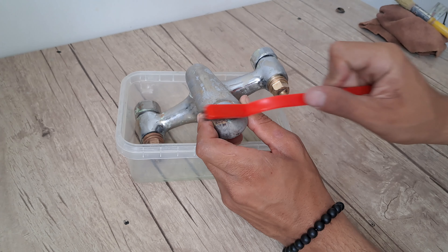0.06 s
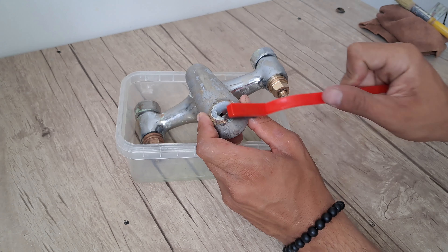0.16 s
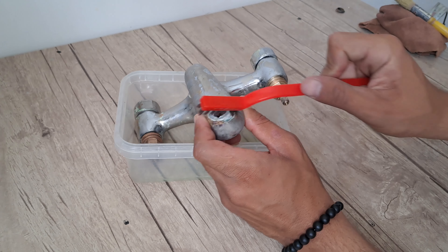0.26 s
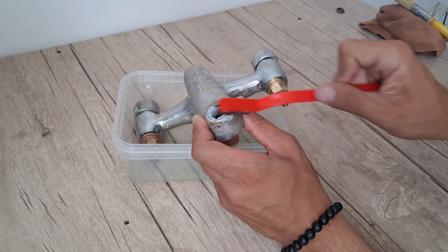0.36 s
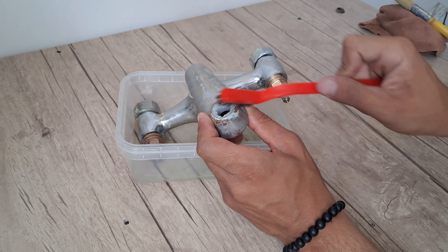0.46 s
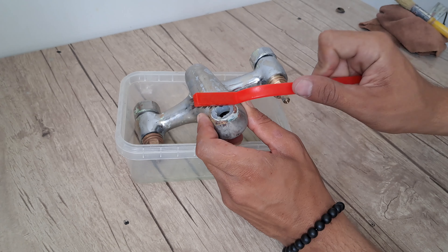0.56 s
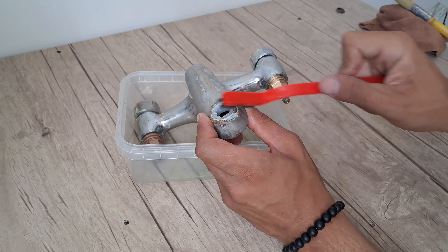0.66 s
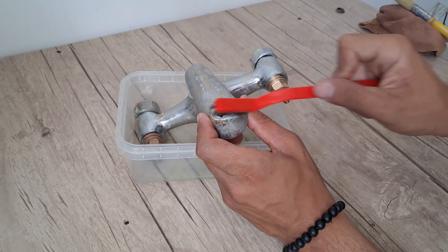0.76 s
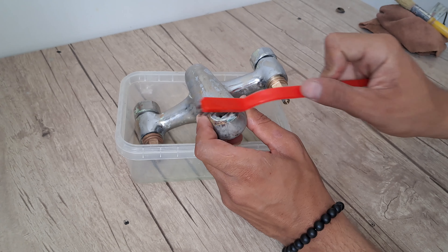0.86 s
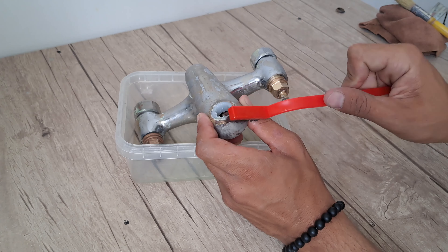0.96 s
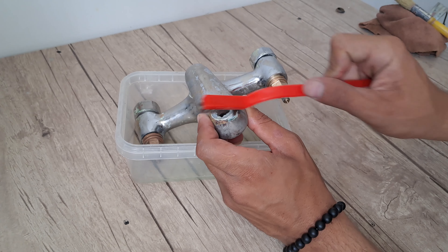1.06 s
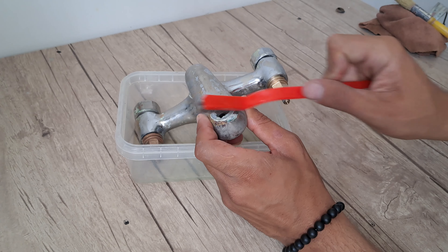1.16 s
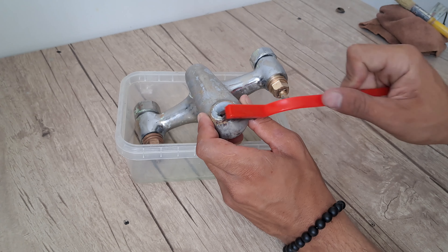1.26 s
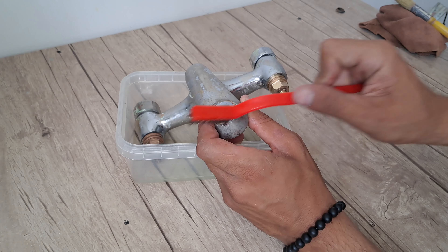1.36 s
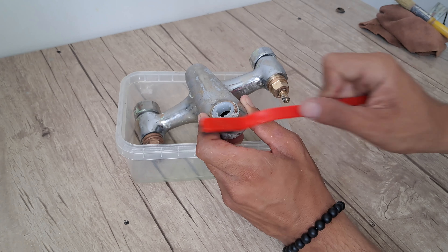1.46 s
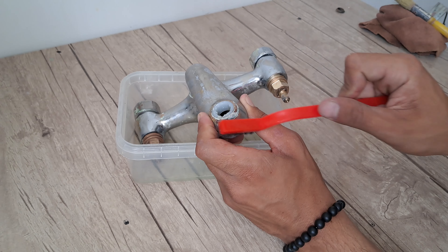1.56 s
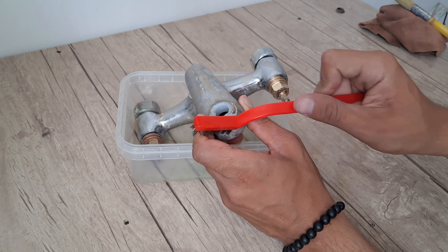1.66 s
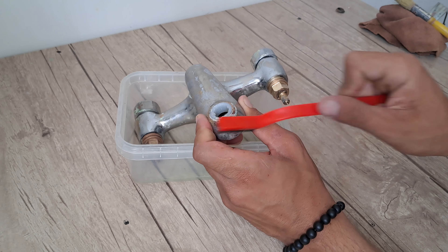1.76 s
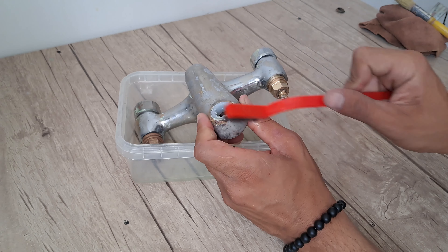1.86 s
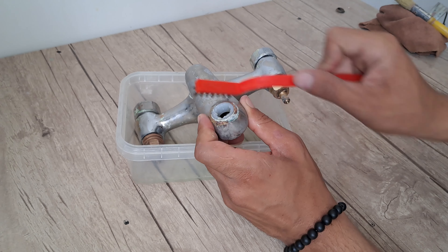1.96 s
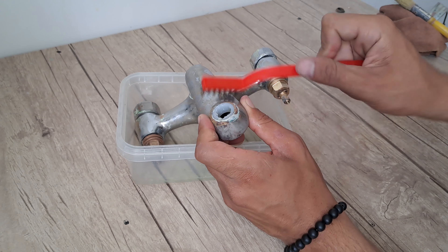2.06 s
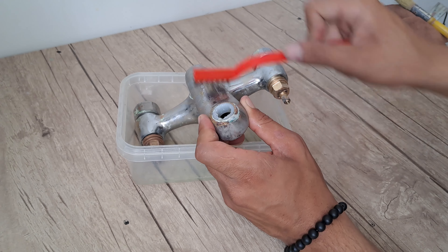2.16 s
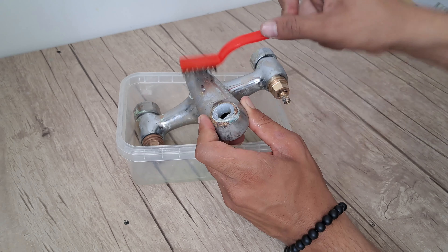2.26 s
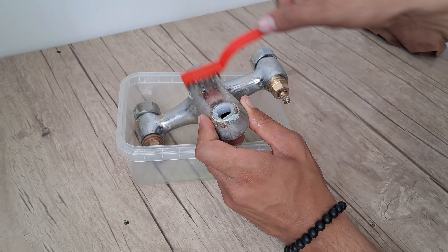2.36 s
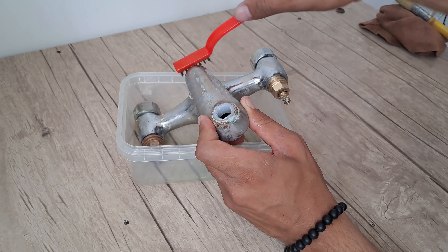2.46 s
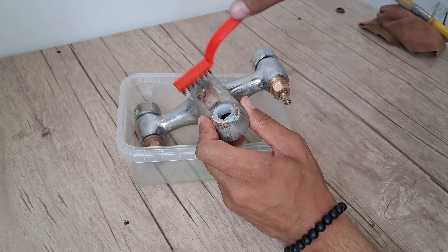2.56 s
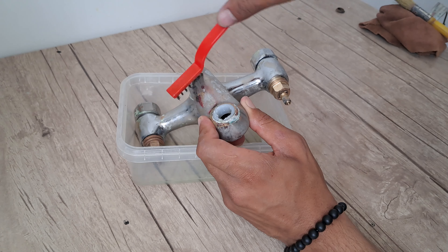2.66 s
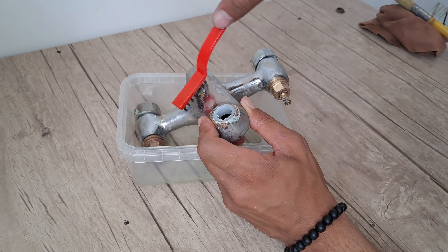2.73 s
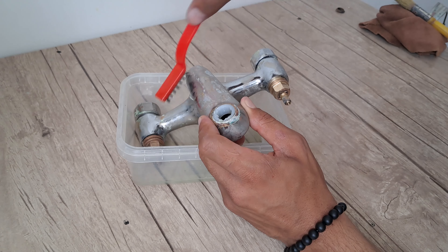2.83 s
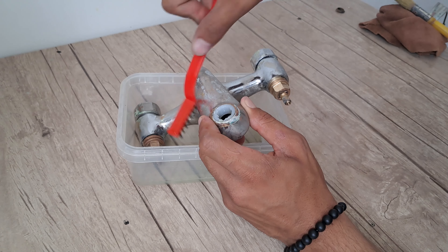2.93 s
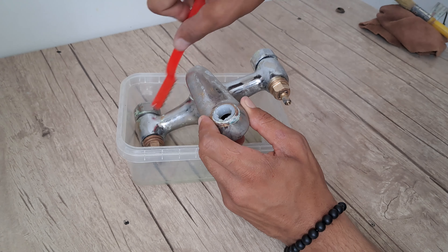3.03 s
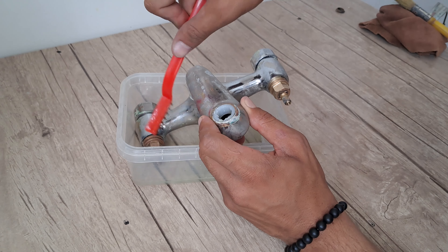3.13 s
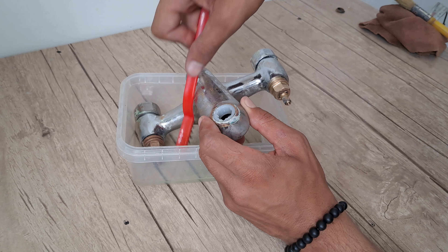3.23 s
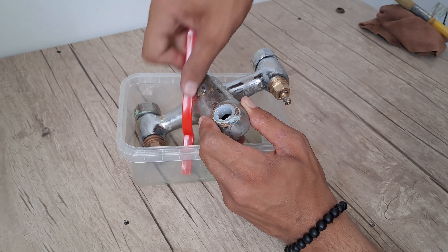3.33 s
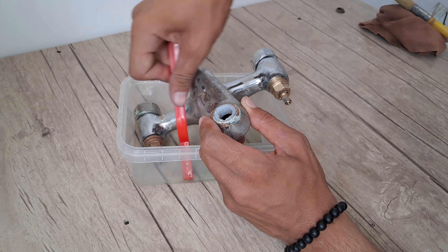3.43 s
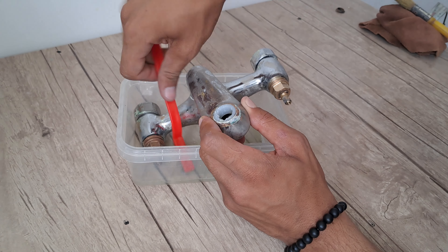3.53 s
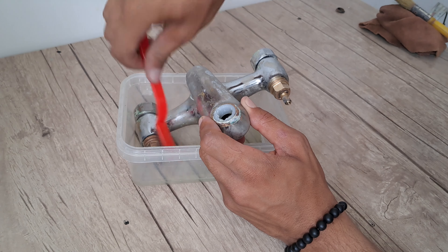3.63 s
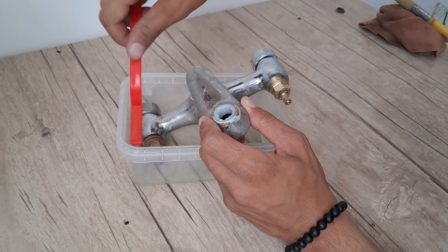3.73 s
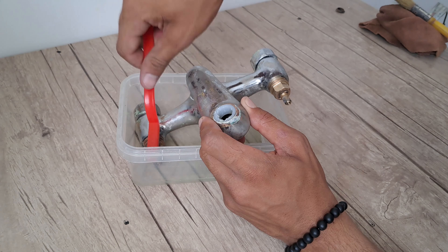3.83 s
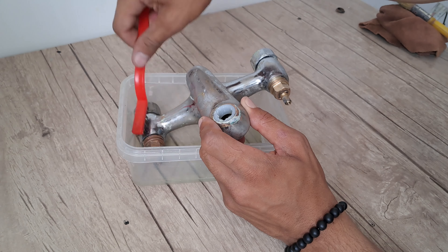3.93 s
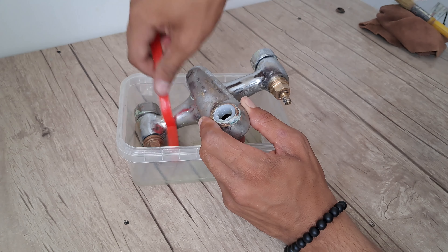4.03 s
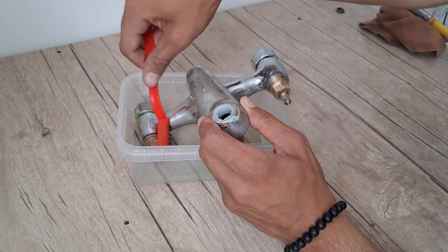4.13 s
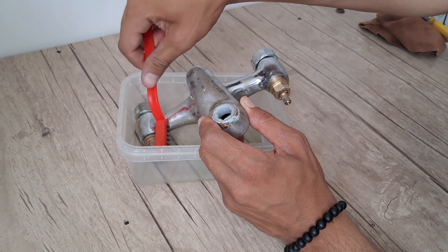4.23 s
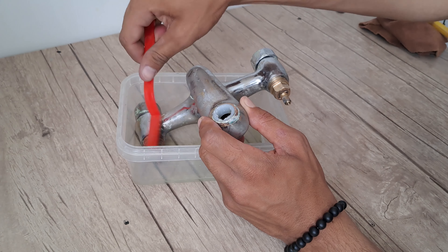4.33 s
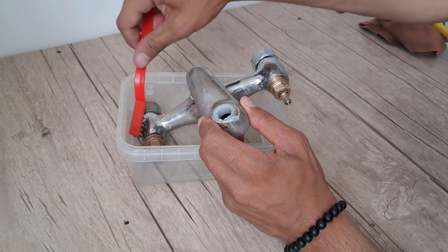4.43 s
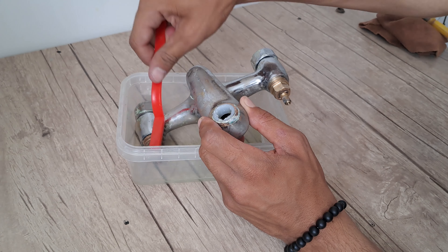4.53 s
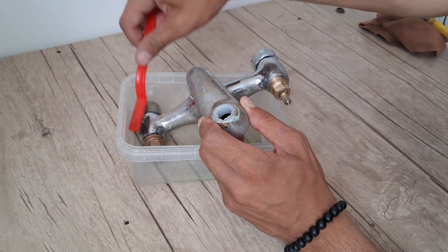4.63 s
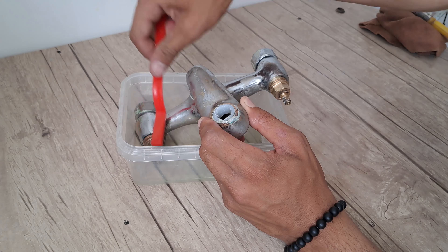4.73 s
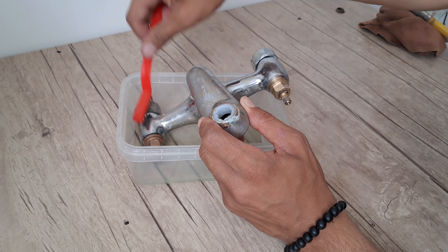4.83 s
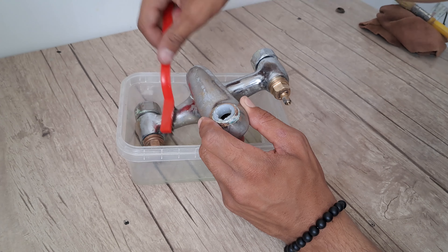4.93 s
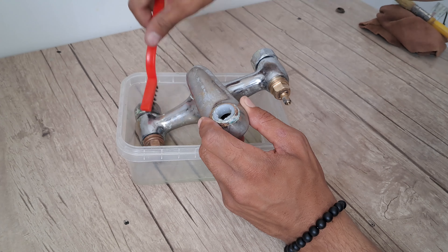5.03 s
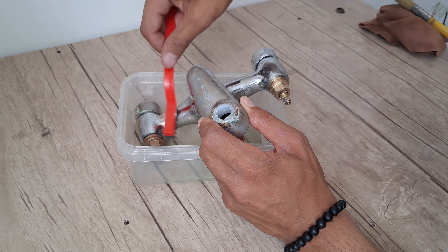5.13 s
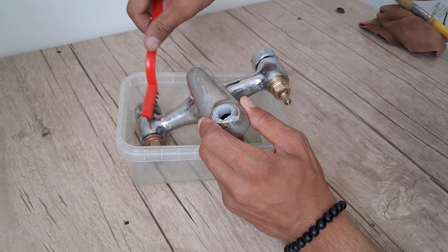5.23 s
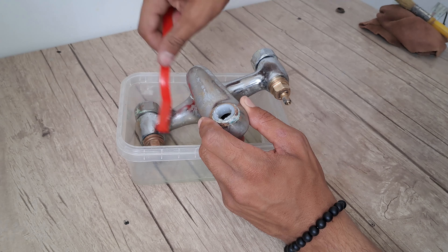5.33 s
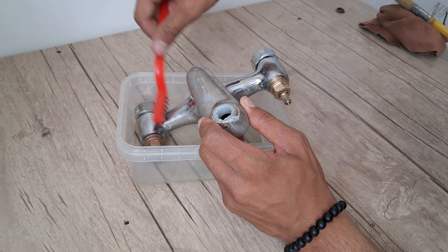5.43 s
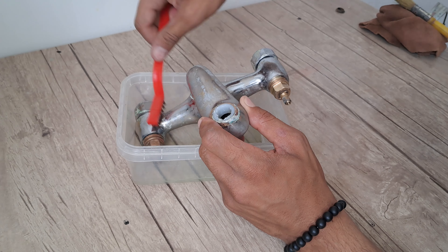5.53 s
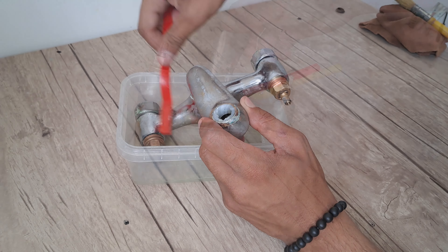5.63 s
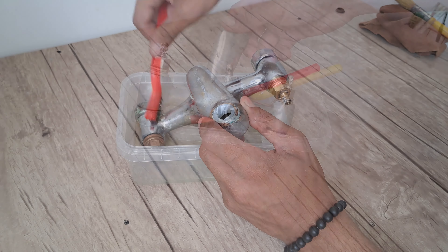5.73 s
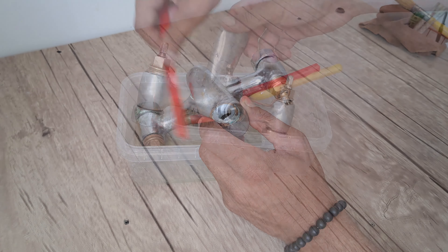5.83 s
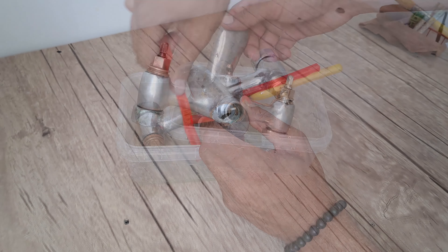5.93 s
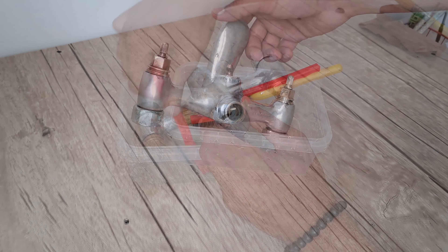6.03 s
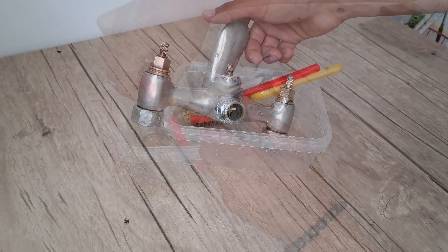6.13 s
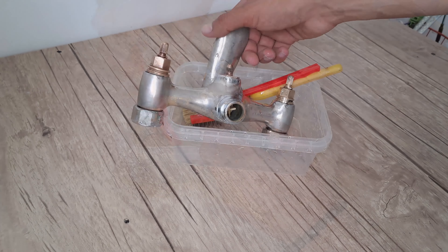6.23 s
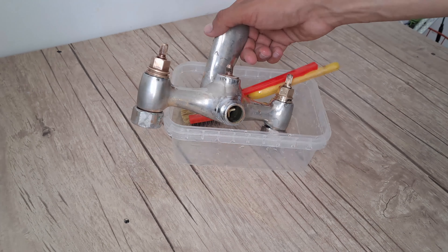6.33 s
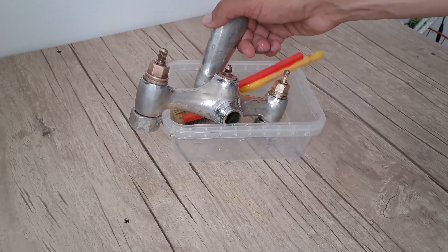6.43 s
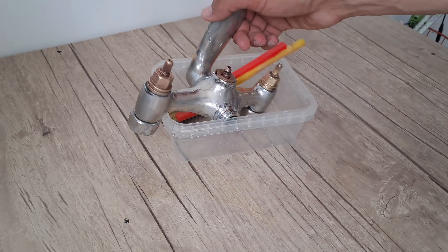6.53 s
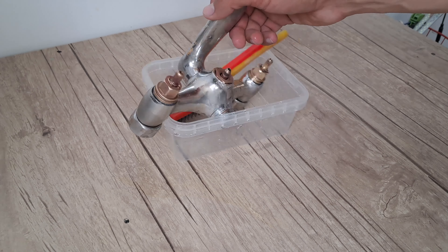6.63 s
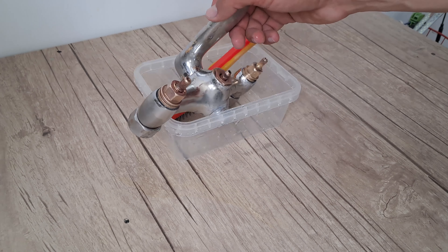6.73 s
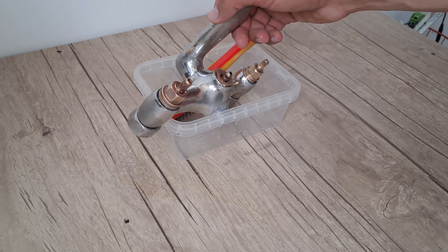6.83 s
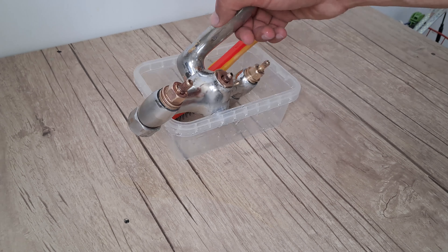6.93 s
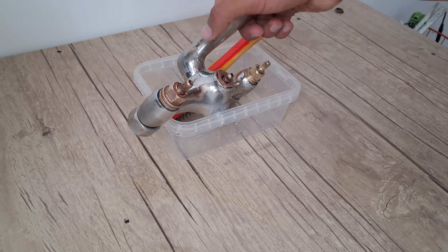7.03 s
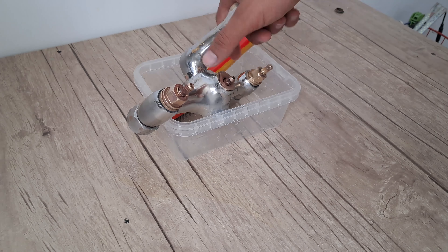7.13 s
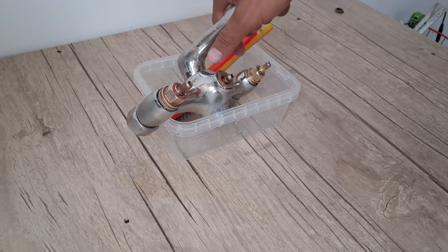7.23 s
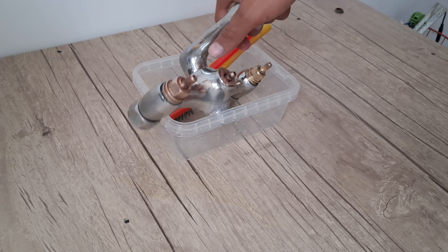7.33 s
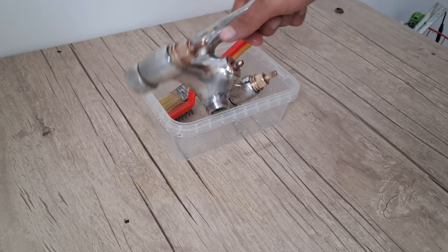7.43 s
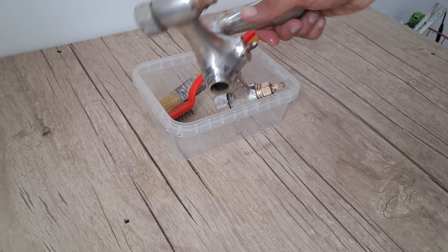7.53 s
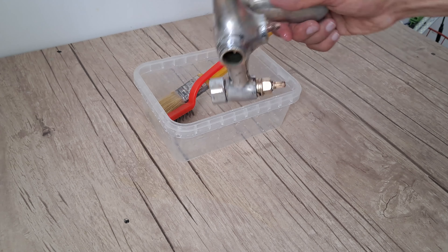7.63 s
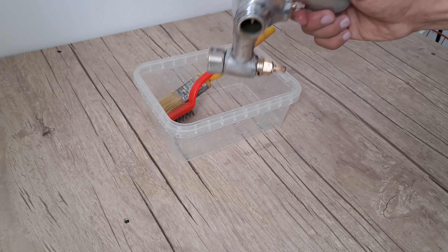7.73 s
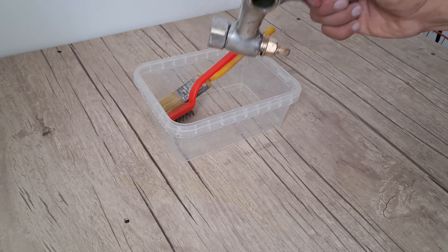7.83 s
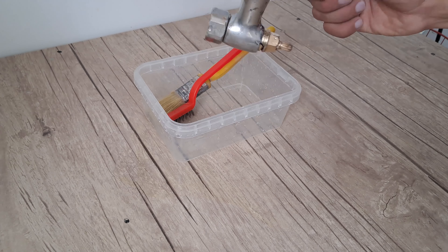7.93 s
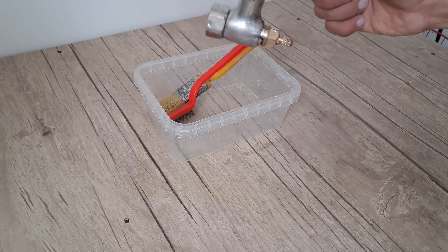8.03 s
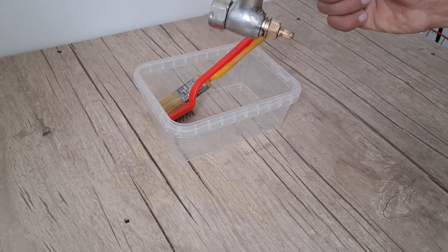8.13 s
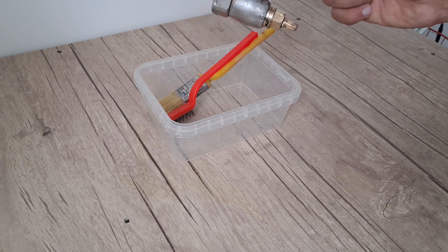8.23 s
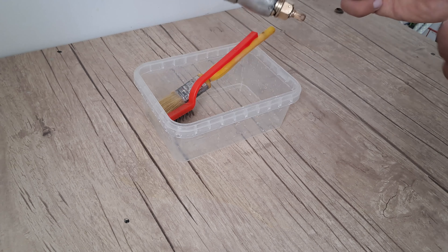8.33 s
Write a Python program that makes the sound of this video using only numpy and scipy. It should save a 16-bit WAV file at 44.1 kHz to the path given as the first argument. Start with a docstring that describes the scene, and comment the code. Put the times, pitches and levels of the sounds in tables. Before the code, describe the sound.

A small quiet room, heard closely in stereo with short soft echoes and faint room noise. From 0 to about 2 s a small wire brush rasps on a metal faucet, roughly seven strokes a second, bright and hissy with small snaps and faint low table rumble. From 2.1 to 3.1 s the strokes turn sparser and change colour, with pings at about 2.5 and 2.9 s and a soft thump near 3. A near pause holds knocks on the plastic tub and a short scrape around 3.6 s. Scrubbing resumes from 3.85 s, more hollow, with firm knocks at 4.1 and 4.65 s, a faint rising squeak at 4.6 s, then rapid even strokes from 5.1 to 5.85 s. After a quiet gap, the tub drags grainily on wood from 6.3 to 6.75 s. Bumps at 7.25 to 7.6 s and bright loose metal clinks until 8.1 s end it.

```python
"""Rasping strokes of a small wire brush on a metal faucet, held over a plastic tub on a wooden table in a small room.
Grains of noise are coloured as wire flicks; the strokes' pull drives drones of brush head and tub, and the table.
Now and then come modal knocks and pings, and one stick-slip squeak as the wires rub the plastic.
Then the tub drags across the table as scraped grains, and the faucet is lifted out with modal clinks."""
import sys
import numpy as np
from scipy import signal
from scipy.fft import rfft, irfft, next_fast_len
from scipy.io import wavfile
from scipy.ndimage import uniform_filter1d, map_coordinates

SR = 44100
rng = np.random.default_rng(int(sys.argv[2]) if len(sys.argv) > 2 else 0)


def waveform_to_disk(signal):
    """Save audio, clipped to [-1, 1], as 16-bit WAV at the path in sys.argv[1]."""
    frames = np.transpose(np.atleast_2d(signal))
    scaled = np.clip(frames, -1, 1) * 32767
    samples = np.round(scaled).astype(np.int16)
    wavfile.write(sys.argv[1], SR, samples)


N = 369558
TIME = np.arange(N) / SR
CUTOFF_HZ = 16200
FIR_SIZE = 16384
GRID_HZ = np.maximum(np.arange(FIR_SIZE // 2 + 1) * SR / FIR_SIZE, 1)


def from_db(db):
    """Decibels to gain."""
    return 10 ** (np.asarray(db) / 20)


def rms_one(x):
    """Scale to rms 1."""
    return x / np.sqrt(np.mean(x ** 2) + 1e-20)


def drift(rate_hz):
    """Smooth chance of rms 1: random knots, rate_hz of them a second."""
    knots = rng.standard_normal(N // 40)
    return rms_one(np.interp(TIME * rate_hz, np.arange(len(knots)), knots))


def level(curve):
    """Gain over time from (t/s, level/dB) rows, silent outside them."""
    s, db = np.transpose(curve)
    inside = (TIME >= s[0]) * (TIME <= s[-1])
    return from_db(np.interp(TIME, s, db)) * inside


def swells(events, rise_s, dies_s):
    """Summed gain of pushes (t/s, level/dB): linear rise, exponential decay."""
    gain = 0
    for s, db in events:
        rise = np.clip((TIME - s) / rise_s, 0, 1)
        gain = gain + from_db(db) * rise * np.exp(-np.maximum(TIME - s - rise_s, 0) / dies_s)
    return gain


def linger(gain, release_s):
    """One-pole smoothing of power: follows a level late and dies away after it."""
    keep = np.exp(-1 / (release_s * SR))
    return np.sqrt(signal.lfilter([1 - keep], [1, -keep], gain ** 2 + 1e-18))


def convolve(x, response):
    """Pass a stereo signal through a response."""
    return signal.fftconvolve(x, np.atleast_2d(response), axes=-1)[:, :N]


def colour(spectrum, peaks=()):
    """Minimum-phase response: broad spectrum, bass roll-off, narrow resonances on top."""
    hz, db = np.transpose(spectrum)
    gain = from_db(np.interp(np.log(GRID_HZ), np.log(hz), db))
    gain = gain / np.sqrt(1 + (hz[0] / 2 / GRID_HZ) ** 4)
    for centre, width, lift_db in peaks:
        gain = gain * (1 + (from_db(lift_db) - 1) / (1 + (2 * (GRID_HZ - centre) / width) ** 2))
    cepstrum = irfft(np.log(gain + 1e-9))[:FIR_SIZE // 2]
    cepstrum[1:] *= 2  # folding the cepstrum makes it causal
    return irfft(np.exp(rfft(cepstrum, FIR_SIZE)))


def favour(x, hz, q):
    """The part of a sound that lies in one resonance."""
    return signal.lfilter(*signal.iirpeak(hz, q, fs=SR), x)


def resonate(x, modes):
    """Parallel resonances (f/Hz, width/Hz, level/dB), steep fall above the last; rms 1."""
    out = 0
    for k, (hz, width, db) in enumerate(modes):
        r = np.exp(-np.pi * width / SR)
        poles = [1, -2 * r * np.cos(2 * np.pi * hz / SR), r * r]
        ring = (1 - r * r) * signal.lfilter([1, 0, -1], poles, x)
        out = out + (-1) ** k * from_db(db) * ring
    lowpass = signal.butter(4, 1.73 * modes[-1][0], fs=SR, output="sos")
    return rms_one(signal.sosfilt(lowpass, out))


def grains(per_s, spread_db, apart):
    """Random tiny slips of uneven size and sign, partly separate at each ear; rms 1."""
    sizes = from_db(spread_db * np.minimum(rng.exponential(1, (3, N)), 4))
    sizes = sizes * rng.choice([-1, 1], (3, N))
    slips = sizes * (rng.random(sizes.shape) < per_s / SR)
    return rms_one(slips[0] + apart * slips[1:])


def late_right(x, lag_s):
    """A source to the left reaches the right ear a little later."""
    size = next_fast_len(N + FIR_SIZE)
    turn = np.exp(-2j * np.pi * np.arange(size // 2 + 1) * SR / size * lag_s)
    return np.array([x[0], irfft(rfft(x[1], size) * turn, size)[:N]])


def close_ears(x):
    """The ears are close together, so they hear the bass alike: the side signal is high-passed."""
    mid, side = (x[0] + x[1]) / 2, (x[0] - x[1]) / 2
    side = signal.lfilter(*signal.butter(1, 240, "high", fs=SR), side)
    return np.array([mid + side, mid - side])


# quiet room noise: f/Hz, level/(dB per Hz)
FLOOR = [(15, -42.5), (25, -7), (102, 0.5), (1820, -26.5), (4690, -30), (7030, -29.5), (8050, -26),
         (15800, -43)]
FLOOR_DB = -71.5


def quiet_room():
    """Steady coloured noise, partly separate at each ear."""
    noise = rng.standard_normal(N) + 1.0 * rng.standard_normal((2, N))
    return from_db(FLOOR_DB) * rms_one(convolve(noise, colour(FLOOR)))


def room(x, t60, wall_hz, first_s):
    """Diffuse decaying echoes, different at each ear and dulled by the walls."""
    t = TIME[:SR // 2]
    tail = rng.standard_normal((2, len(t))) * np.exp(-np.log(1000) * t / t60) * (t > first_s)
    tail = tail / np.sqrt(np.sum(tail ** 2) / 2)
    return convolve(x, signal.lfilter(*signal.butter(1, wall_hz, fs=SR), tail))


# table-top resonances: f/Hz, width/Hz, level/dB
TABLE = [(71.7, 5.7, -4), (94.6, 21, -7.5), (122.9, 8.6, 3.5), (139, 7.9, -3.5), (178, 130, -18)]
# faucet weight shifts and rocks the tub: t/s, level/dB
ROCKS = [(0.35, -44.5), (0.525, -41), (1.125, -46), (1.39, -37), (2.215, -44), (2.615, -41), (2.825, -39),
         (2.88, -37), (3.01, -38.5), (3.39, -46.5), (7.268, -37.5), (7.6, -45.5)]
ROCK_RISE_S, ROCK_DIES_S = 0.0067, 0.05


def table(stroke_shake):
    """Strokes and rocking drive the heavy top, which follows late and rings on."""
    shake = np.hypot(stroke_shake, swells(ROCKS, ROCK_RISE_S, ROCK_DIES_S))
    return linger(shake, release_s=.024) * resonate(grains(per_s=3000, spread_db=3.0, apart=0.27), TABLE)


# tub scraped by the brush head, later dragged over the table: start t/s, full speed t/s, stop t/s, level/dB
RUBS = [(3.541, 3.625, 3.645, -43), (6.297, 6.472, 6.735, -33.5)]
RUB_SAG_DB_PER_S, RUB_STOP_DB_PER_S = 14, 541
# scrape spectrum: f/Hz, level/(dB per Hz)
DRAG_COLOUR = [(70, -14.5), (160, -1.5), (280, 3), (550, 0), (1000, -1.5), (1450, -12), (2500, -12.5),
               (4500, -17.5), (7500, -18), (8700, -24.5), (12000, -19), (15800, -24.5)]
# tub-wall resonances: f/Hz, width/Hz, lift/dB
DRAG_SINGS = [(84.4, 4.1, 19.5), (121.8, 4.3, 17.5), (336.3, 9.7, 7.5), (503, 110, 6.5), (894, 270, 5.5),
              (8100, 210, 0)]


def rubbed_tub():
    """Plastic catches and slips, tub walls ring; each rub speeds up, eases off and stops short."""
    gain = 0
    for start, full, stop, db in RUBS:
        speed = np.sin(np.interp(TIME, [start, full], [0, np.pi / 2])) ** 2
        sag_db = RUB_SAG_DB_PER_S * np.maximum(TIME - full, 0)
        stop_db = RUB_STOP_DB_PER_S * np.clip(TIME - stop, 0, 1)
        gain = gain + speed * from_db(db - sag_db - stop_db)
    slips = grains(per_s=3500, spread_db=2.0, apart=1.0) * from_db(1.0 * drift(110))
    return gain * rms_one(convolve(slips, colour(DRAG_COLOUR, DRAG_SINGS)))


# each rebound delay is REBOUND_S times a random 0.43-2.2
REBOUND_S, REBOUND_DB = 0.009, -11


def blows(events, modes, bass_db, crack_db, rattle_db, rattle_t60, detune, split_hz, top_hz, spot_db, spot_q):
    """Crack with one rebound, ringing modes, dying rattle; harder blows have more highs, fewer lows."""
    t, out = TIME[:SR // 3], np.zeros((2, N + SR))
    bands_hz = [[130, 1100], [split_hz, 5000], [5000, CUTOFF_HZ]]
    registers = [signal.butter(4, edges, "band", fs=SR, output="sos") for edges in bands_hz]
    contact = signal.butter(2, top_hz, fs=SR, output="sos")
    hz, db, t60 = np.transpose(modes)[:, :, None]
    chatter = np.resize(from_db(4.0 * drift(220)), N + SR)  # the parts bounce unevenly

    def ear_noise(apart):
        return rng.standard_normal(len(t)) + apart * rng.standard_normal((2, len(t)))

    for s, blow_db, tilt_db, spot_hz, crack_s in events:
        at = int(s * SR)
        levels_db = [blow_db + bass_db - tilt_db, blow_db, blow_db + tilt_db]
        # grip and contact point vary: so do mode pitch and strength
        pitches = hz * (1 + detune * rng.standard_normal(hz.shape))
        rings = np.sin(2 * np.pi * pitches * t) * from_db(db - 60 * t / t60)
        strengths_db = 2 * rng.standard_normal(len(modes)) + 2 * rng.standard_normal((2, len(modes)))
        strengths = rng.choice([-1, 1], len(modes)) * from_db(strengths_db)
        since_rebound = t - REBOUND_S * rng.uniform(0.43, 2.2)
        rebound = from_db(REBOUND_DB) * np.exp(-np.abs(since_rebound) / crack_s) * (since_rebound > 0)
        crack = from_db(crack_db) * ear_noise(1.0) * (np.exp(-t / crack_s) + rebound)
        rattle = from_db(rattle_db) * chatter[at:at + len(t)] * ear_noise(1.46)
        for k, (register, level_db) in enumerate(zip(registers, levels_db)):
            dying = np.exp(-np.log(1000) * t / (rattle_t60 * 0.65 ** k))  # highs die first
            part = signal.sosfilt(np.vstack([register, contact]), strengths @ rings + crack + rattle * dying)
            part = part * from_db(level_db) / part[:, :SR // 50].std()  # level of the first 20 ms
            out[:, at:at + len(t)] += part + (from_db(spot_db) - 1) * favour(part, spot_hz, spot_q)
    return out[:, :N]


# loose parts clink: t/s, level/dB, hardness as treble tilt/dB, struck-spot f/Hz, contact length/s
CLINKS = [(7.383, -53.5, -1, 5500, 0.0034), (7.678, -47, 7, 9300, .0026), (7.833, -74, -2, 2300, 0.0032),
          (7.912, -74, 4, 5600, .003), (7.979, -46, 7.5, 5800, 0.0025), (8.012, -51, -4, 2550, 0.0028),
          (8.041, -47.5, 9, 3600, 0.0021), (8.114, -45.5, 4, 9800, 0.0031)]
# clink modes: f/Hz, level/dB, t60/s
CLINK_MODES = [(1401, 7.5, 0.062), (2210, 5.5, 0.086), (2580, 10.5, 0.032), (2910, 6.5, 0.1),
               (3560, 6, 0.027), (4100, -5, 0.063), (5660, 15, 0.049), (5940, 5.5, 0.03), (7600, -7, 0.054),
               (9020, 4, 0.049), (9760, 8, 0.043), (11300, 0, 0.054)]


def clinks():
    """Loose faucet parts strike each other in the lift; mostly mid and high modes."""
    return blows(CLINKS, CLINK_MODES, bass_db=-27, crack_db=17, rattle_db=1, rattle_t60=0.11,
                 detune=0.00073, split_hz=1290, top_hz=10300, spot_db=7, spot_q=5.8)


# brush head and faucet hit the tub: t/s, level/dB, hardness as treble tilt/dB, struck-spot f/Hz, contact length/s
KNOCKS = [(3.059, -48.5, -9, 229, 0.0017), (3.362, -50.5, -9, 292, 0.002), (3.402, -53, -8, 1720, 0.0089),
          (3.606, -54.5, 6, 1800, .003), (3.635, -50.5, -6.5, 980, 0.0056), (4.083, -39, -1.5, 260, 0.0075),
          (4.419, -51.5, -7, 2310, 0.0019), (4.452, -57.5, -8, 2300, .012), (4.664, -35, -4, 670, .0012),
          (7.264, -62.5, -6, 2400, .005), (7.277, -56.5, -6.5, 301, 0.0046),
          (7.424, -55, -7.5, 1060, 0.0064), (7.572, -52.5, -9.5, 299.4, 0.0012),
          (7.584, -45.5, -12, 1890, .002), (7.626, -59.5, -9, 2390, 0.0075),
          (7.637, -63.5, -1, 1900, 0.0027)]
# knock modes: f/Hz, level/dB, t60/s
KNOCK_MODES = [(203.6, 2, 0.22), (292.3, 8, 0.23), (356, 5, 0.32), (499.6, 10, 0.094), (723.3, 8.5, 0.087),
               (884, 5.5, 0.079), (1037, 4.5, 0.12), (1910, 14, 0.06), (2345, 13.5, 0.15), (3120, 11, 0.07),
               (5800, 9, 0.057)]


def knocks():
    """Brush head and faucet strike the tub; low modes ring longest."""
    return blows(KNOCKS, KNOCK_MODES, bass_db=-1, crack_db=33.0, rattle_db=9.5, rattle_t60=0.29,
                 detune=0.017, split_hz=1490, top_hz=11500, spot_db=6.5, spot_q=3.6)


# wire or brush edge on bare metal: t/s, level/dB, hardness as treble tilt/dB, struck-spot f/Hz, contact length/s
PINGS = [(1.7, -51, -12.5, 2350, 0.0035), (2.489, -42, -6, 4500, 0.0016), (2.934, -48, -0.5, 2980, 0.011),
         (2.982, -44.5, -9, 2330, 0.0033), (3.022, -50.5, 6, 11500, 0.0055), (3.248, -50, -1, 2820, 0.0019),
         (3.927, -54, -21, 3360, 0.0032), (5.914, -59, 11, 7950, .004)]
# ping modes: f/Hz, level/dB, t60/s
PING_MODES = [(2770, 12, 0.031), (3144, 5, 0.039), (4470, 10.5, 0.036), (5500, 10, 0.04), (8000, 17, 0.076),
              (12700, 8, 0.06)]


def pings():
    """A wire or the brush's edge strikes bare metal; short bright modes."""
    return blows(PINGS, PING_MODES, bass_db=-20, crack_db=20.5, rattle_db=13.5, rattle_t60=0.15,
                 detune=0.0046, split_hz=1780, top_hz=11900, spot_db=5, spot_q=5.5)


# wires squeak on plastic: t/s, f/Hz, level/dB
SQUEAK = [(4.56, 2150, -73), (4.59, 2330, -66), (4.635, 2550, -73)]


def squeak():
    """Short stick-slip tone with one overtone, rising as the brush speeds up."""
    s, hz, db = np.transpose(SQUEAK)
    pitch_hz = np.interp(TIME, s, hz) * (1 + 0.013 * drift(500))
    phase = 2 * np.pi * np.cumsum(pitch_hz) / SR
    tone = np.sin(phase) + from_db(-6.5) * np.sin(2 * phase)
    return level(np.transpose([s, db])) * np.sqrt(2) * tone


# evenly paced strokes: start t/s, end t/s, number of strokes, rasp level/dB
BOUTS = [(-0.04, 0.064, 1, -40.5), (0.102, 0.218, 1, -45.5), (0.209, 0.355, 1, -43.5),
         (0.348, 0.488, 1, -44), (0.466, 0.631, 1, -44), (0.613, 0.776, 1, -47), (0.764, 0.891, 1, -43),
         (0.93, 1.04, 1, -45.5), (1.047, 1.159, 1, -43), (1.219, 1.296, 1, -45.5), (1.311, 1.472, 1, -43),
         (1.468, 1.597, 1, -51), (1.606, 1.724, 1, -49.5), (1.725, 1.903, 1, -56), (1.895, 2.04, 1, -46.5),
         (2.1, 2.194, 1, -60.5), (2.186, 2.283, 1, -43.5), (2.3, 2.387, 1, -49.5), (2.389, 2.493, 1, -45),
         (2.53, 2.693, 2, -49), (2.691, 2.82, 1, -53.5), (2.814, 2.878, 1, -41.5), (2.88, 2.934, 1, -55),
         (2.97, 3.097, 1, -49.5), (3.364, 3.482, 1, -63), (3.508, 3.682, 1, -53.5), (3.845, 3.89, 1, -52.5),
         (3.892, 4, 1, -46), (4, 4.093, 1, -44), (4.13, 4.26, 1, -60.5), (4.273, 4.384, 1, -64.5),
         (4.371, 4.478, 1, -54), (4.505, 4.613, 1, -54), (4.6, 4.774, 2, -48.5), (4.799, 4.913, 1, -48.5),
         (4.91, 5.007, 1, -49.5), (5.006, 5.093, 1, -43), (5.099, 5.806, 8, -46.5), (5.809, 5.863, 1, -52)]
# crest: share of the stroke at which it is fastest; the wires bend over one after another
CREST_SHARE, FULLNESS, BEND_S = 0.46, 0.73, 0.0091
PRESSURE_WAVER_DB, PRESSURE_WAVERS_PER_S = 0.51, 100


def stroke_gain():
    """Pull swells and fades with stroke speed and wavers with hand pressure."""
    power = np.zeros(N)
    for start, end, strokes, db in BOUTS:
        progress = np.interp(TIME, [start, end], [0, strokes]) % 1
        speed = np.sin(np.pi * np.interp(progress, [0, CREST_SHARE, 1], [0, .5, 1]))
        power += 2 * (from_db(db) * np.abs(speed) ** FULLNESS) ** 2
    power = np.abs(uniform_filter1d(power, int(BEND_S * SR)))
    return np.sqrt(power) * from_db(PRESSURE_WAVER_DB * drift(PRESSURE_WAVERS_PER_S))


# share of flicks that each ear hears on its own: the wires are spread out
WIRES_APART = .8
# each resonance comes and goes as the wires catch
SING_SWING_DB, SING_CHANGES_PER_S = 4.5, 18


def wire_rasp(spectrum, sings):
    """Wire tips snap free in small bunches and set the metal singing in bursts; rms 1 in the treble."""
    flicks = grains(per_s=7000, spread_db=3.5, apart=WIRES_APART)
    flicks = flicks * from_db(1.7 * drift(260) + 1.9 * drift(55))
    flat = convolve(flicks, colour(spectrum))
    rasp = flat
    for hz, width, lift_db in sings:
        swing = from_db(SING_SWING_DB * np.minimum(drift(SING_CHANGES_PER_S), 1))
        rasp = rasp + (from_db(lift_db) - 1) * favour(flat, hz, hz / width) * swing
    # changing wire angles: the brightest hiss wavers on its own
    rasp = rasp + favour(rasp, 12800, q=2.5) * (from_db(1.6 * drift(25)) - 1)
    # near reflection off faucet and tub moves with the brush and shifts the hiss colour
    bounce_s = .0007 + .00006 * drift(7)
    bounce = np.array([map_coordinates(ear, [(TIME - bounce_s) * SR], order=3) for ear in rasp])
    rasp = rasp + from_db(-15.0) * bounce
    treble = signal.sosfilt(signal.butter(4, [5000, CUTOFF_HZ], "band", fs=SR, output="sos"), rasp)
    return rasp / treble.std()


# wander as a share of the pitch, from grip and pressure
DRONE_WANDER, DRONE_CHANGES_PER_S = .05, 9


def wander(x):
    """Slide all resonances of a steady sound up and down together by varied reading speed."""
    reading = np.cumsum(1 + DRONE_WANDER * drift(DRONE_CHANGES_PER_S))
    return np.array([map_coordinates(ear, [reading], order=1, mode="mirror") for ear in x])


# brush moves on from the mouth to the spout, then to a valve inside the tub
TO_SPOUT_S, TO_VALVE_S = 2.1, 3.5
# rasp spectrum at each place: f/Hz, level/(dB per Hz)
MOUTH_RASP = [(650, -50), (1100, -21), (1200, -20.5), (1740, -17.5), (2480, -11), (2970, -16), (3790, -4.5),
              (5010, -9), (6920, -6.5), (7740, -4), (8460, -8.5), (12600, 3), (15800, -7)]
SPOUT_RASP = [(650, -52), (1100, -25.5), (2600, -9.5), (3170, -11.5), (4050, -1.5), (5920, -6),
              (6700, -9.5), (7830, -7), (8750, -13.5), (12600, 3.5), (15800, -4.5)]
VALVE_RASP = [(650, -52), (1100, -33.5), (1900, -13), (2540, -18), (3140, -11), (5860, -8.5), (6330, -11.5),
              (7830, -6.5), (8650, -5), (12400, 2), (15800, -4)]
# singing wires and faucet: f/Hz, width/Hz, lift/dB
MOUTH_SINGS = [(7950, 56, 8.5), (10890, 90, 3.5), (12660, 140, 4.5)]
SPOUT_SINGS = [(7950, 124, 14.3), (10800, 120, 4), (12740, 130, 6.5)]
VALVE_SINGS = [(6160, 170, 9.2), (7800, 90, 7), (10000, 220, 6), (11700, 94, 5)]
# drone of brush head and tub: f/Hz, width/Hz, level/dB
MOUTH_DRONE = [(235, 59, -7), (283, 67, -1.5), (546, 350, -15), (805, 72, 5.5), (925, 210, -8.5)]
SPOUT_DRONE = [(194, 60, 29.5), (307, 100, 19), (440, 100, -40), (818, 70, 19)]
VALVE_DRONE = [(215, 29, -1.5), (285, 30.5, 7.5), (364, 47, 4), (476, 47, -5), (536, 170, -15)]
# shaking at mouth, spout, valve: drone level/dB, table level/dB, share of the rasp's swing followed
COUPLING = [(-12, -7.5, 1), (-16.5, -12, 0.85), (-4.5, -2.5, 1.0)]
LIGHT_STROKE_DB = -53  # rasp level of a light stroke, reference for the coupling
# wire bunch slips over an edge and snaps free: t/s, rasp level/dB
SNAPS = [(0.545, -46), (0.882, -48), (1.14, -35.5), (1.202, -54), (1.695, -49), (2.025, -39.5),
         (2.203, -38.5), (4.385, -45), (4.77, -42)]
SNAP_RISE_S, SNAP_DIES_S = 0.0032, 0.0085
# brush head shoves the faucet, tub thumps softly: t/s, level/dB
THUMPS = [(2.24, -46.5), (2.85, -50.5), (3.0, -42), (3.06, -37), (3.6, -43), (4.085, -39.5), (4.43, -42),
          (4.84, -45.5), (5.02, -41), (5.207, -40), (5.565, -34.5), (5.74, -39.5), (7.272, -42),
          (7.58, -35.5)]
THUMP_RISE_S, THUMP_DIES_S = 0.013, 0.018
# wires drag on while the hand turns
TURN_DRAG_DB, TURN_RELEASE_S = -10.5, 0.017
# bent wires trail with a duller scrape
TRAIL_DB, TRAIL_HZ, TRAIL_S = -8, 2050, 0.017


def brush():
    """Wires rasp on three faucet parts in turn; their pull drives the drones. Returns sound, table shake gain."""
    gain = stroke_gain()
    dragging = from_db(TURN_DRAG_DB) * linger(gain, TURN_RELEASE_S)
    trailing = from_db(TRAIL_DB) * linger(gain, TRAIL_S) * (TIME < TO_VALVE_S)
    snapping = swells(SNAPS, SNAP_RISE_S, SNAP_DIES_S)
    rasp_gain = np.sqrt(gain ** 2 + dragging ** 2 + snapping ** 2)

    place = np.searchsorted([TO_SPOUT_S, TO_VALVE_S], TIME)
    drone_db, rumble_db, follows = np.array(COUPLING)[place].T
    body = from_db(LIGHT_STROKE_DB) * (gain / from_db(LIGHT_STROKE_DB)) ** follows
    drone_gain = np.hypot(body * from_db(drone_db), swells(THUMPS, THUMP_RISE_S, THUMP_DIES_S))

    pull = grains(per_s=4000, spread_db=1.0, apart=0.41)
    places = [(MOUTH_RASP, MOUTH_SINGS, MOUTH_DRONE, .00006),  # last: right-ear lag, s
              (SPOUT_RASP, SPOUT_SINGS, SPOUT_DRONE, .00011),
              (VALVE_RASP, VALVE_SINGS, VALVE_DRONE, .00015)]
    sounds = []
    for spectrum, sings, drone_modes, lag_s in places:
        rasp = wire_rasp(spectrum, sings)
        trail = trailing * favour(rasp, TRAIL_HZ, q=1.38)
        drone = drone_gain * wander(resonate(pull, drone_modes))
        sounds.append(late_right(rasp_gain * rasp + trail + drone, lag_s))
    return np.choose(place, sounds), body * from_db(rumble_db)


def scene():
    """Scrubbing, knocks, drag and lift in one room; table and room noise added without echo."""
    scrub, stroke_shake = brush()
    handling = (knocks() + rubbed_tub()) * from_db([[-1.0], [1.0]])  # slightly right
    handling = handling + late_right(pings() + clinks(), lag_s=.00009)
    near = scrub + squeak() + handling
    echoes = from_db(-5.5) * room(near, t60=0.23, wall_hz=5036, first_s=0.0052)
    return close_ears(near + echoes) + table(stroke_shake) + quiet_room()


def record(dry):
    """Steep low-pass at CUTOFF_HZ."""
    return signal.sosfilt(signal.ellip(10, .2, 70, CUTOFF_HZ, fs=SR, output="sos"), dry)


dry = scene()
out = record(dry)
waveform_to_disk(out)
```